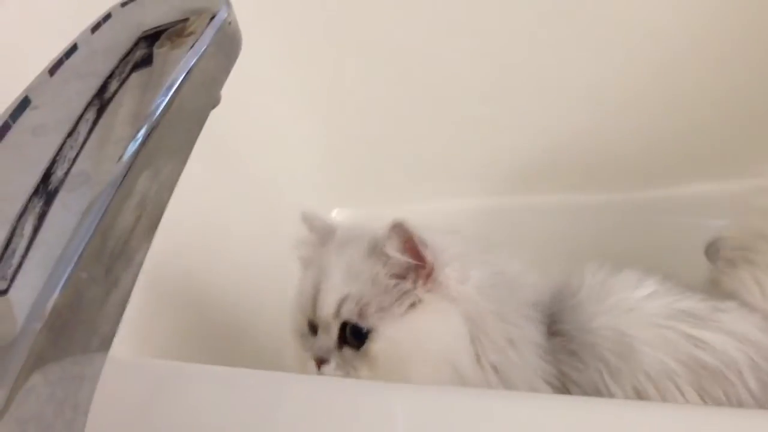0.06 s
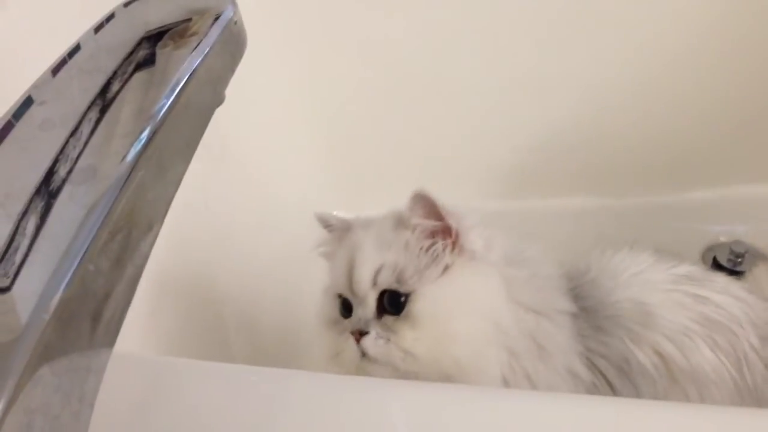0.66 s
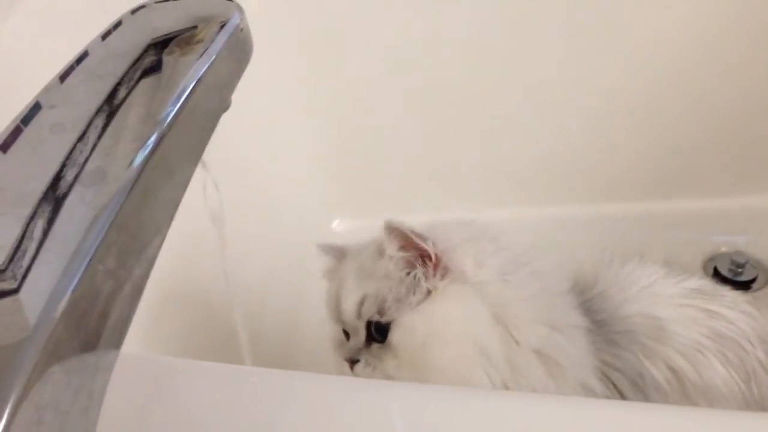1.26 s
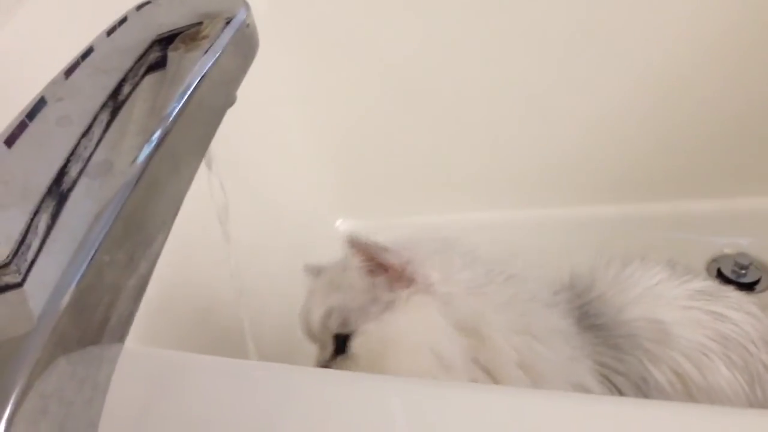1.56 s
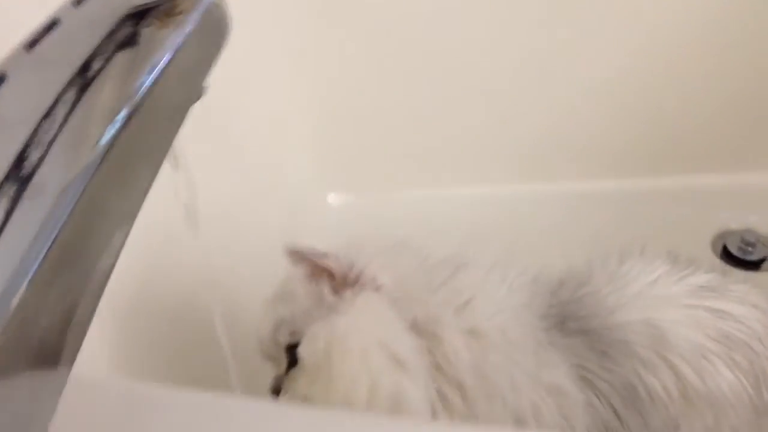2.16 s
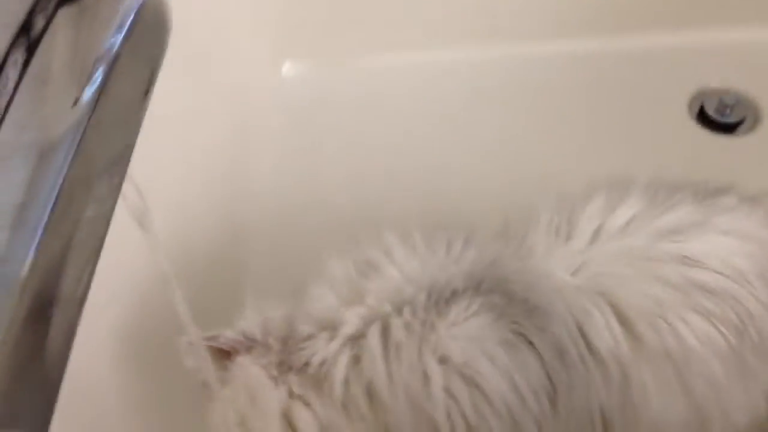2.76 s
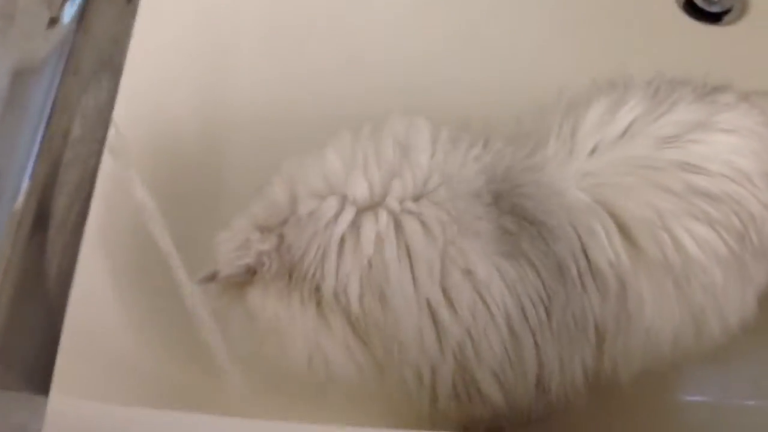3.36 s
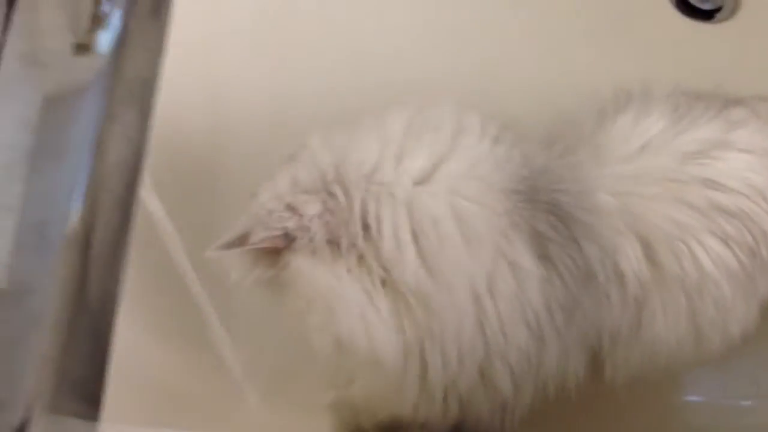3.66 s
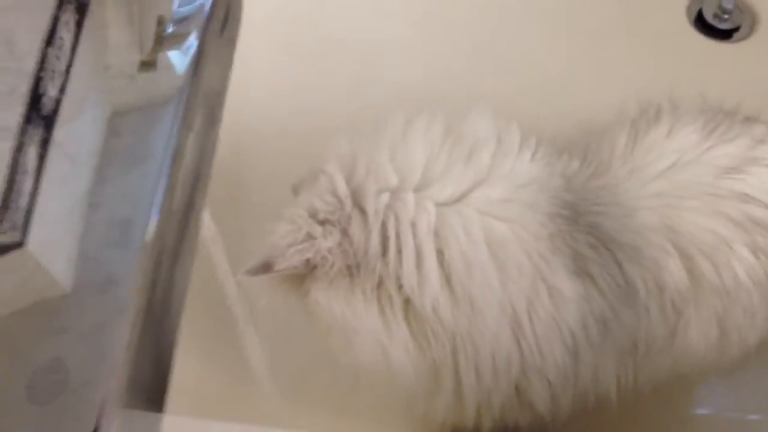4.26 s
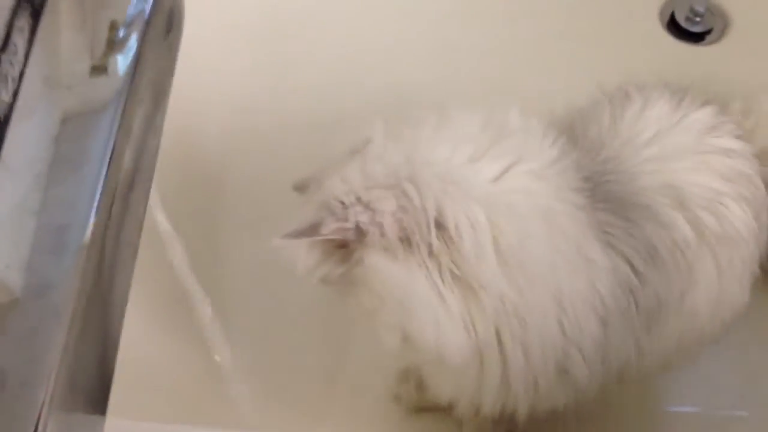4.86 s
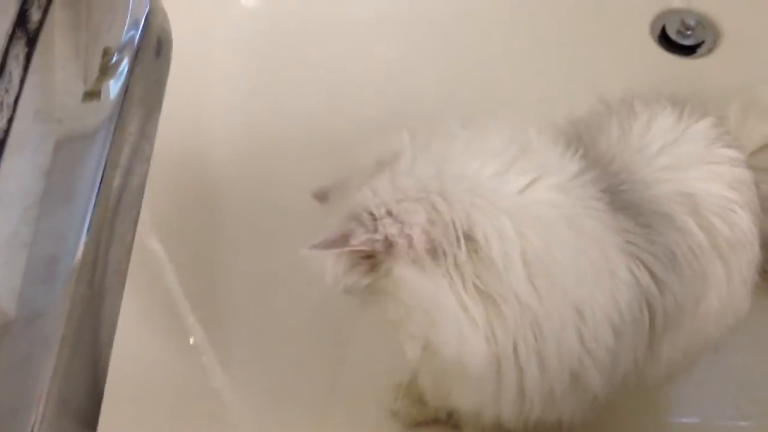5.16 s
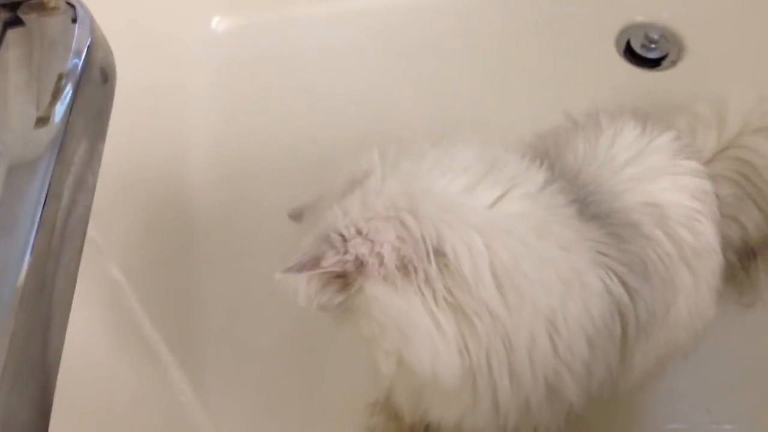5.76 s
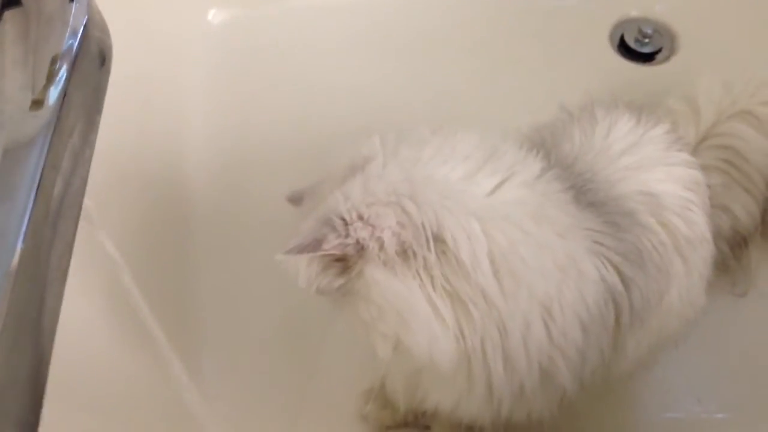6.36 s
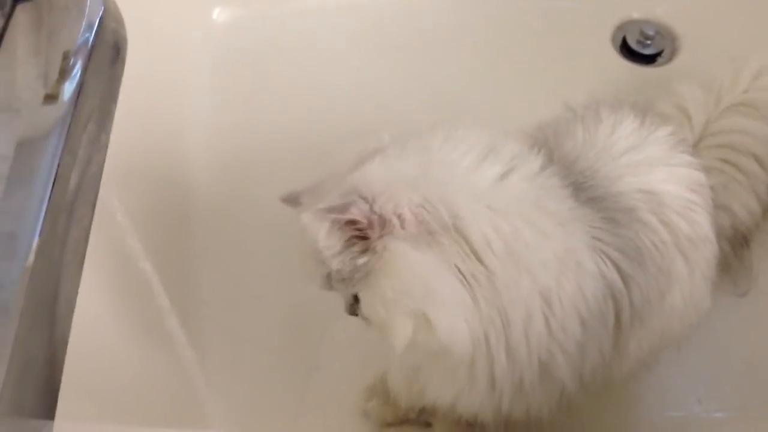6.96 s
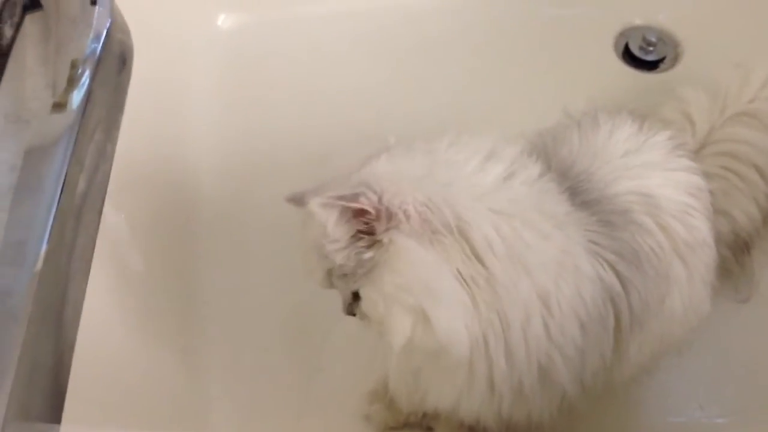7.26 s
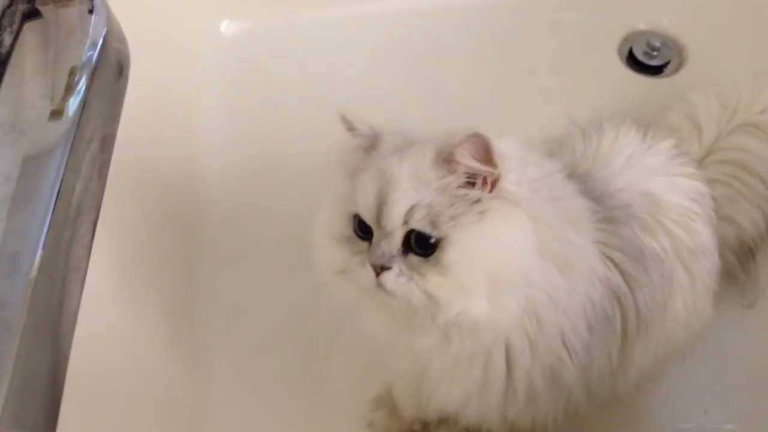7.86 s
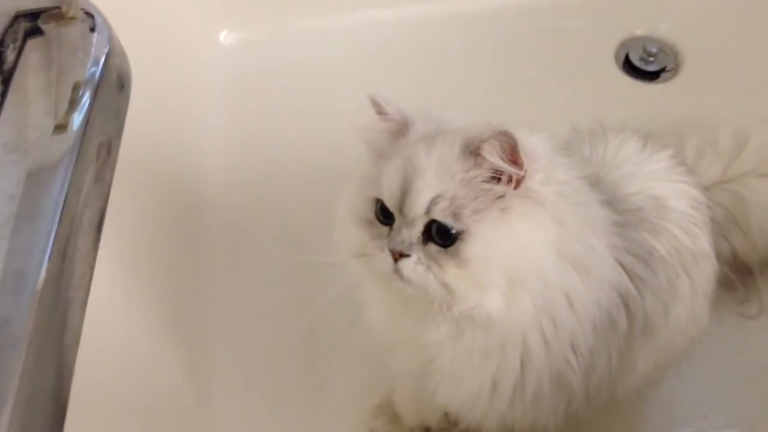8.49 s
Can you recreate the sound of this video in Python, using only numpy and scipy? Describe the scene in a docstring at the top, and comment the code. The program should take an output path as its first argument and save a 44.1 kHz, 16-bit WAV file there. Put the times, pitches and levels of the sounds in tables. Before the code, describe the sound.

A thin stream of water runs from a faucet into a bathtub, starting after several short, dull knocks and little spits. The hiss has a slightly ringing tone that shifts as the close microphone moves, over a soft patter on the tub wall. The water is then shut off with small knocks and a low thump from the pipe, and only the faint hum of a small, echoing bathroom remains.

```python
"""A few dull knocks as a bathtub tap is eased open; water seeps, spits and settles into a thin stream.
The valve's hiss is coloured by narrow resonances of spout and room, and pitches in it swell and fade
as the microphone moves, while drops drum softly on the tub wall.
The tap shuts with a thump of the pipe, leaving the faint electric hum of a small hard-walled bathroom."""
import sys
import numpy as np
from scipy import signal
from scipy.fft import rfft, irfft, next_fast_len
from scipy.io import wavfile
from scipy.ndimage import map_coordinates

SR = 44100
rng = np.random.default_rng(int(sys.argv[2]) if len(sys.argv) > 2 else 0)


def transcribe(signal):
    """Save signal, clipped to [-1, 1], as a 16-bit WAV file at the path in sys.argv[1]."""
    frames = np.atleast_2d(signal).T
    limited = np.clip(frames, -1, 1)
    pcm = np.round(limited * 32767).astype(np.int16)
    wavfile.write(sys.argv[1], SR, pcm)


N = 380482
TIME = np.arange(N) / SR
OPEN_S, OPENING_S, SHUT_S, SHUTTING_S = 0.95, 0.049, 6.8, 0.038
SETTLE_S, SETTLING_S = 1.9, 0.51  # the flow steadies
LEAN_S, LEANING_S = 1.94, 0.53  # the microphone leans in over the rim: more drumming, less fine spray


def from_db(db):
    """Decibels to gain."""
    return 10 ** (np.asarray(db) / 20)


def rms_one(x):
    """Scale to unit rms."""
    return x / np.sqrt(np.mean(x ** 2) + 1e-20)


def at_hz(points, hz):
    """Read a table on a log-frequency axis."""
    knots, values = np.transpose(points)
    return np.interp(np.log(hz + 1e-9), np.log(knots), values)


def ramp(start, length):
    """An envelope that rises from 0 to 1 and holds."""
    return np.clip((TIME - start) / length, 0, 1)


def burst(start, rise_s, decay_s):
    """An envelope with a fast attack and an exponential decay."""
    return ramp(start, rise_s) * np.exp(-np.maximum(TIME - start, 0) / decay_s)


def swell(start, length, fade_s):
    """An envelope that fades in, holds and fades out."""
    return ramp(start - fade_s / 2, fade_s) - ramp(start + length - fade_s / 2, fade_s)


def drift(rate_hz):
    """Smooth random modulation with unit rms."""
    hop, warm_up = 40, 2000
    r = np.exp(-2 * np.pi * rate_hz * hop / SR)
    noise = rng.standard_normal(N // hop + warm_up + 2)
    slow = signal.lfilter([1], [1, -2 * r, r * r], noise)[warm_up:]
    return np.interp(np.arange(N) / hop, np.arange(len(slow)), rms_one(slow))


def turbulence(colour):
    """Unit-rms noise of a given colour, rolling off beyond its ends."""
    size = next_fast_len(N)
    hz = np.arange(size // 2 + 1) * SR / size
    skirts = np.minimum(hz / colour[0][0], 1) ** 2 / np.maximum(hz / colour[-1][0], 1) ** 2
    spectrum = rfft(rng.standard_normal(size)) * from_db(at_hz(colour, hz)) * skirts
    return rms_one(irfft(spectrum, size)[:N])


def resonate(x, hz, width_hz):
    """A band-pass resonance with unity gain at its peak."""
    r, w = np.exp(-np.pi * width_hz / SR), 2 * np.pi * hz / SR
    return signal.lfilter(np.array([1, 0, -1]) * (1 - r * r) / 2, [1, -2 * r * np.cos(w), r * r], x)


def whistle(hz, width_hz):
    """Noise twice through a resonance: a breathy tone with steep flanks."""
    return resonate(resonate(rng.standard_normal(N), hz, 2 * width_hz), hz, 2 * width_hz)


def ring(clicks, hz, t60):
    """A struck mode: each click starts a decaying sine of its own height."""
    r, w = from_db(-60 / (t60 * SR)), 2 * np.pi * hz / SR
    return signal.lfilter([0, np.sin(w)], [1, -2 * r * np.cos(w), r * r], clicks + 1e-18)


def wander(x, depth_db, patch_s, patch_hz, size=1024):
    """Shifting colour: narrow bands swell and sink, each on its own."""
    hz, s, bands = signal.stft(x, SR, nperseg=size)
    field = rng.standard_normal(bands.shape)
    for axis, span in enumerate((patch_hz / hz[1], patch_s / s[1])):
        field = signal.lfilter([1], [1, -np.exp(-1 / span)], field, axis=axis)
    return signal.istft(bands * from_db(depth_db * rms_one(field)), SR, nperseg=size)[1][:N]


def room_tone(air_db):
    """A bed of still air and a wavering hum on multiples of the mains frequency."""
    # mains harmonics: (frequency [Hz], level [dB])
    harmonics = [(240, -83), (360, -80), (1440, -94.5), (1800, -99), (2040, -86.5), (2160, -100.5)]
    # colour of the air: (frequency [Hz], relative level [dB])
    air_colour = [(30, -19), (60, -5), (90, -9), (120, -4.5), (200, 1.5), (330, -1), (520, -5), (750, -9.5),
                  (1100, -12.5), (1900, -12.5), (2900, -8.5), (4500, -8.5), (12000, -11), (15300, -11.5)]
    hum = sum(from_db(db + drift(2.2)) * np.sqrt(2) * np.sin(2 * np.pi * (hz * TIME + rng.random()))
              for hz, db in harmonics)
    return from_db(air_db) * turbulence(air_colour) + hum


def knocks(scatter_db, scuff_db, rebound_s=.02, rebound_loss_db=12, contact_s=0.0071, pivot_hz=600):
    """Each knock and its two rebounds scuff, and hit every mode with a strength and lag of their own."""
    # knocks on tap and tub: (time [s], level [dB], first rebound vs knock [dB], brightness [dB/octave])
    hits = [(.057, -50.5, 1.5, -0.5), (.272, -48, -3, -2), (.503, -48, -18.5, 0.5), (.826, -51, -2.5, -2),
            (.946, -48, -20, -2), (6.699, -53, -18, -10), (6.778, -53, -20, 1), (6.848, -50.5, -16, 3),
            (7.117, -66, -20, 0), (8.272, -69, -20, -11)]
    # ring of tap and tub: (frequency [Hz], gain [dB], t60 [s])
    modes = [(342, -11, 0.16), (420, -6.5, 0.19), (455, -8.5, 0.36), (490, -7.5, 0.18), (554, -6.5, 0.16),
             (638, -7, 0.083), (740, -9, 0.11), (774, -3.5, 0.091), (850, -5.5, .06), (1006, -16, 0.099),
             (1136, -11, 0.088), (1235, -18, 0.065), (1465, -18, 0.096), (1820, -19, 0.076),
             (2340, -17, 0.064)]
    # colour of the contact noise: (frequency [Hz], relative level [dB])
    scuff_colour = [(280, -8.5), (450, 1.5), (850, -15), (1400, -12.5), (2200, -23), (4500, -28),
                    (5300, -19), (6500, -42)]
    blows = [(s, db, tilt) for s, db, _, tilt in hits]
    rebounds = [(s + (k + 1) * rebound_s, db + rebound_db - k * rebound_loss_db, tilt)
                for s, db, rebound_db, tilt in hits for k in range(2)]
    s, db, tilt = np.transpose(blows + rebounds)
    out = np.zeros(N)
    for k, (hz, mode_db, t60) in enumerate(modes):
        clicks = np.zeros(N)
        onsets = np.round((s + rng.random(len(s)) * contact_s) * SR).astype(int)
        strike_db = db + mode_db + tilt * np.log2(hz / pivot_hz)
        clicks[onsets] = from_db(strike_db + scatter_db * rng.standard_normal(len(s)))
        out += (-1) ** k * ring(clicks, hz, t60)
    contact = sum(from_db(level) * burst(start, 0.0033, 0.024) for start, level in zip(s, db))
    out += from_db(scuff_db) * contact * turbulence(scuff_colour)
    return signal.sosfilt(signal.butter(2, 220, "high", fs=SR, output="sos"), out)


def narrow_valve():
    """Seep and a thin jet step with each nudge and fade as the flow settles; half open, the valve spurts."""
    # colours of the seep and of the thin jet: (frequency [Hz], relative level [dB])
    seep_colour = [(410, -19), (700, -4.5), (1030, -4.5), (1710, -3.5), (2030, -9), (2370, -3), (2860, -8),
                   (4350, -3), (5550, -27), (6500, -26), (8450, -49), (14300, -120)]
    jet_colour = [(4000, -17), (5300, 1), (6600, -18), (7150, -1), (9000, 4.5), (9600, -3), (10200, -1),
                  (11000, -4), (11600, 0.5), (12800, -3), (13700, -10), (15300, -3.5)]
    # each nudge opens the valve a step: (time [s], seep [dB], jet [dB])
    nudges = [(.27, -75, -95), (.525, -66, -72.5), (.83, -59.5, -55), (.96, -58, -72)]
    # spurts on opening and closing: (time [s], length [s], seep [dB], jet [dB], squeal [Hz], squeal [dB])
    spurts = [(0.97, .085, -65.5, -47, 2470, -46.5), (6.69, .09, -54, -53, 7900, -56)]
    seep, jet = turbulence(seep_colour), turbulence(jet_colour)
    out = 0
    for s, seep_db, jet_db in nudges:
        crossfade = ramp(s, .025)
        out = (1 - crossfade) * out + crossfade * (from_db(seep_db) * seep + from_db(jet_db) * jet)
    out = out * (1 - ramp(SETTLE_S, SETTLING_S))
    for s, length, seep_db, jet_db, hz, squeal_db in spurts:
        squeal = rms_one(whistle(hz, width_hz=0.09 * hz))
        spurt = from_db(seep_db) * seep + from_db(jet_db) * jet + from_db(squeal_db) * squeal
        out = out + swell(s, length, fade_s=0.031) * spurt
    return out


def spits(decay_s):
    """Short bursts of hiss as the barely open valve lets a little water through."""
    # spits of water: (time [s], level [dB])
    cues = [(.405, -60), (.551, -55), (.703, -59)]
    # their colour: (frequency [Hz], relative level [dB])
    colour = [(2200, -3), (2650, 4), (3100, -5), (4400, -6), (5200, -8)]
    return sum(from_db(db) * burst(s, .003, decay_s) for s, db in cues) * turbulence(colour)


def open_valve(rush_db=-5, ringing_db=-2.84, spray_db=-51, spray_lean_db=-1.76):
    """Full flow: a fluttering rush, the ring of spout and room, fine spray and passing pitches."""
    # hiss of the open tap, riding rush and ringing together: (time [s], level [dB])
    flow = [(1.1, -47), (1.63, -46), (2.25, -47.5), (2.27, -44.5), (2.42, -47.5), (2.69, -45.5),
            (6.7, -45.5)]
    # colours of the broad rush and of the spray: (frequency [Hz], relative level [dB])
    rush_colour = [(600, -25), (800, -12), (960, -17), (1020, -3), (1550, 2.5), (2250, 0), (2700, -3.5),
                   (3100, 5.5), (4800, 0.5), (5800, 0.5), (6150, -19), (7500, -16)]
    spray_colour = [(4500, -4), (6000, -0.5), (6400, 0.5), (7300, 0.5), (7800, 3), (9000, 1), (10500, -0.5),
                    (12300, -0.5), (13700, -5.5), (15300, -9)]
    hiss_db = np.interp(TIME, *np.transpose(flow))
    opening = ramp(OPEN_S, OPENING_S) - ramp(SHUT_S - SHUTTING_S, SHUTTING_S)
    rush = from_db(hiss_db + rush_db) * turbulence(rush_colour) * from_db(.5 * drift(48))
    ringing = from_db(hiss_db + ringing_db) * resonant_hiss(waver_db=2.0)
    spray = from_db(spray_db + spray_lean_db * ramp(LEAN_S, LEANING_S)) * turbulence(spray_colour)
    return opening * (rush + ringing + spray + passing_pitches()) * from_db(0.38 * drift(9.9))


def resonant_hiss(waver_db):
    """Narrow resonances of spout and room colour the hiss, each with a wavering strength."""
    # resonances of spout and room: (frequency [Hz], width [Hz], relative gain [dB])
    resonances = [(1009, 20, -12), (1226, 34, -10), (1560, 38, -9.5), (1640, 42, -17.5), (1840, 27, -11),
                  (2170, 150, -14.5), (2300, 26, -20), (2948, 65, -8.5), (3202, 56, -0.5), (3430, 230, -19),
                  (3403, 33, -4.5), (3494, 37, 1), (3663, 100, -3), (3637, 14, 1.5), (3740, 93, -2.5),
                  (3788, 58, -4), (4080, 200, -11), (4234, 67, -2.5), (4260, 69, -18.5), (4560, 56, -7),
                  (4745, 180, -11), (5260, 84, -21), (5500, 58, -15), (5840, 35, -6)]
    return rms_one(sum(whistle(hz, width_hz) * from_db(db + waver_db * drift(25))
                       for hz, width_hz, db in resonances))


def passing_pitches(width_share=.017):
    """Overtones ring until the flow settles; then narrow pitches swell and fade as the microphone moves."""
    # overtones of the unsettled flow: (frequency [Hz], level [dB])
    overtones = [(2580, -61.5), (3280, -58), (3920, -51.5), (4570, -56.5), (5170, -61)]
    # narrow pitches in the hiss: (time [s], length [s], frequency [Hz], level [dB])
    pitches = [(1.998, 0.77, 5945, -56), (3.55, 1.7, 4615, -56), (3.645, 0.87, 5680, -55.5),
               (3.898, 0.64, 7750, -59), (2.65, 3.93, 3765, -51.5), (5.6, 1.25, 4200, -55.5)]
    early = sum(from_db(db) * rms_one(whistle(hz, width_share * hz)) for hz, db in overtones)
    later = sum(from_db(db) * rms_one(whistle(hz, width_share * hz)) * swell(s, length, fade_s=0.15)
                for s, length, hz, db in pitches)
    return early * (1 - ramp(SETTLE_S, SETTLING_S)) + later


def drumming(drops_per_s, size_spread_db, fall_s, level_db=-59.5, lean_db=1):
    """The stream breaks into drops that drum on the tub wall, falling on briefly after the tap shuts."""
    # tub wall resonances: (frequency [Hz], width [Hz], relative gain [dB])
    resonances = [(160, 7.3, -36), (219.6, 6, 5), (250, 6.4, 4.5), (290.3, 7.4, 3.5), (317.7, 27, 5.5),
                  (383, 40, 1.5), (480, 46, 6.5), (504, 8.3, 7.5), (585, 22, -21), (660, 5.5, -20),
                  (710, 26, -11), (767, 35, -5.5), (858, 17, -1), (911, 26, -2.5)]
    sizes = from_db(size_spread_db * np.minimum(rng.exponential(1, N), 4)) * rng.choice([-1, 1], N)
    drops = sizes * (rng.random(N) < drops_per_s / SR)
    drops = drops * (ramp(OPEN_S, OPENING_S) - ramp(SHUT_S, fall_s))
    wall = sum(from_db(db) * resonate(drops + 1e-18, hz, width_hz) for hz, width_hz, db in resonances)
    wall = signal.sosfilt(signal.butter(2, [150, 1200], "band", fs=SR, output="sos"), wall)
    return from_db(level_db + lean_db * ramp(LEAN_S, LEANING_S)) * rms_one(wall)


def water_hammer(at_s, push_s):
    """The halted water column gives the pipe one soft shove; the wall radiates no deep bass."""
    # pipe modes: (frequency [Hz], level [dB], t60 [s])
    modes = [(127, -58, 0.18), (144, -46, 0.32), (160.2, -43.5, 0.33), (188, -54, 0.14)]
    push = np.maximum(1 - np.abs(TIME - at_s) / push_s, 0)
    thump = sum(from_db(db) * ring(push / push.sum(), hz, t60) for hz, db, t60 in modes)
    return signal.sosfilt(signal.butter(6, [116, 300], "band", fs=SR, output="sos"), thump)


def bathroom(x, wet_db, sway_ms=0.396, predelay_s=.004):
    """Dense reflections die band by band and slide against the direct sound as the microphone sways."""
    # reverb time: (frequency [Hz], t60 [s])
    decay = [(150, 0.3), (500, 1), (3500, 0.66), (8000, 0.48), (15000, 0.16)]
    t = TIME[:SR // 2]
    edges = np.geomspace(90, 16000, 9)
    tail = 0
    for low, high in zip(edges, edges[1:]):
        band_pass = signal.butter(2, [low, high], "band", fs=SR, output="sos")
        band = signal.sosfilt(band_pass, rng.standard_normal(len(t)))
        band = band * from_db(-60 * t / at_hz(decay, np.sqrt(low * high))) * (t > predelay_s)
        tail = tail + band * np.sqrt(2 * (high - low) / SR / np.sum(band ** 2))  # equal energy per Hz
    heard_at = (TIME - sway_ms / 1000 * drift(.3)) * SR
    echoes = map_coordinates(signal.fftconvolve(x, tail), [heard_at], order=3)
    wet = from_db(wet_db)
    return (x + wet * echoes) / np.sqrt(1 + wet ** 2)


def scene():
    """Water, tub and knocks, each with its own reverb send, over room tone; alike in both ears."""
    hiss = wander(open_valve() + narrow_valve(), depth_db=2.5, patch_s=0.12, patch_hz=67)
    water = bathroom(hiss + spits(decay_s=0.012), wet_db=-4.5)
    drops = drumming(drops_per_s=1100, size_spread_db=3.0, fall_s=0.2)
    tub = bathroom(drops + water_hammer(at_s=6.85, push_s=0.0016), wet_db=-10.5)
    tap = bathroom(knocks(scatter_db=2.0, scuff_db=-6.0), wet_db=-8.0)
    return np.tile(water + tub + tap + room_tone(air_db=-68), (2, 1))


def record(dry):
    """A small microphone drops the bass; the top is cut steeply."""
    thin = signal.sosfilt(signal.butter(2, 115, "high", fs=SR, output="sos"), dry)
    return signal.sosfilt(signal.ellip(12, .1, 70, 15385, fs=SR, output="sos"), thin)


dry = scene()
out = record(dry)
transcribe(out)
```